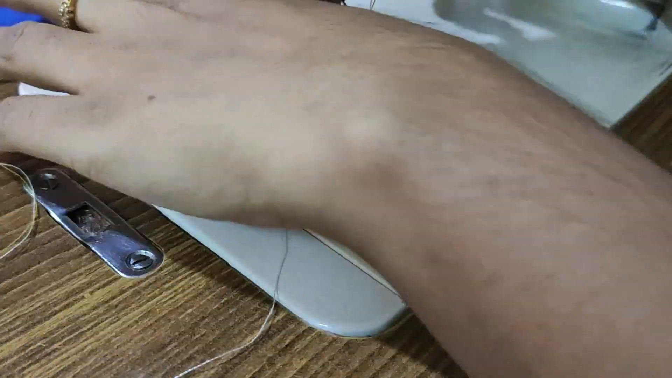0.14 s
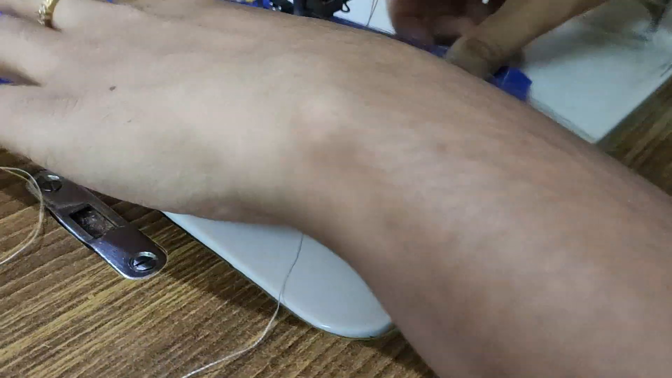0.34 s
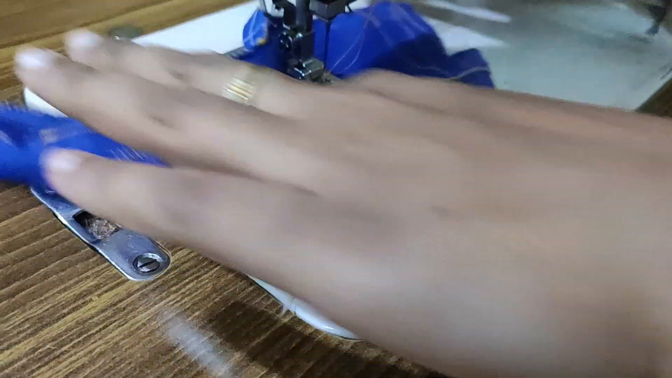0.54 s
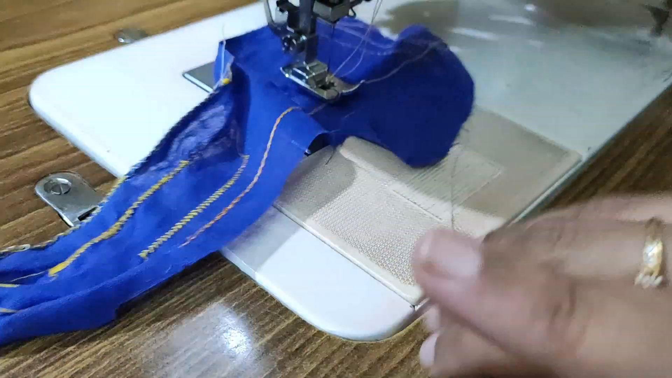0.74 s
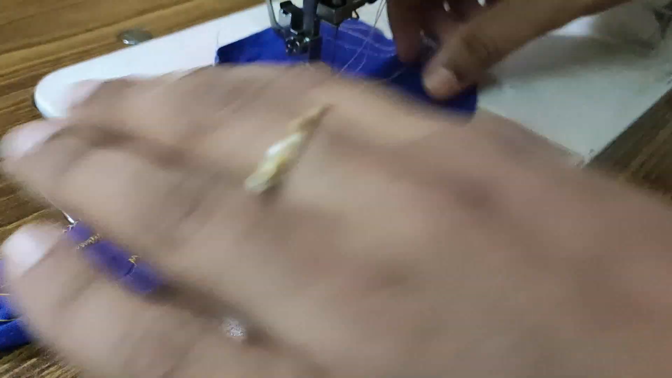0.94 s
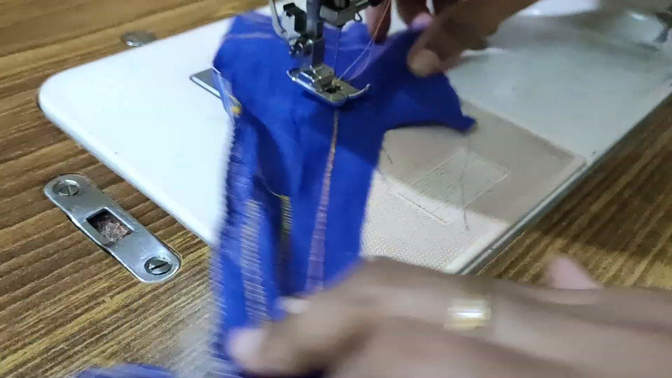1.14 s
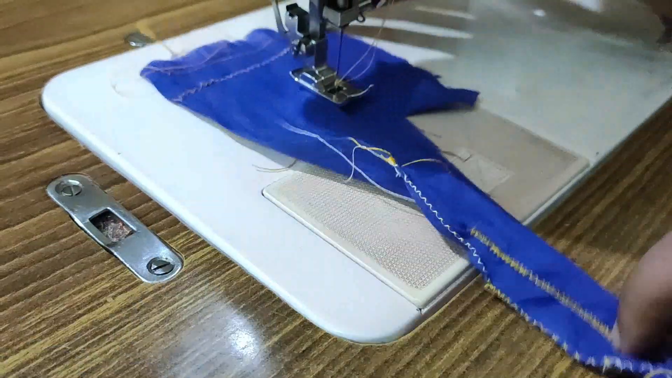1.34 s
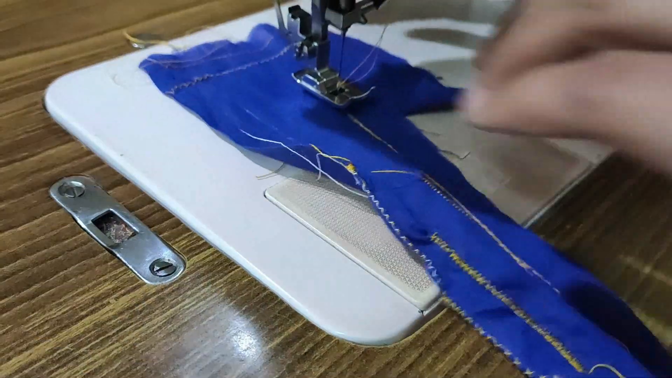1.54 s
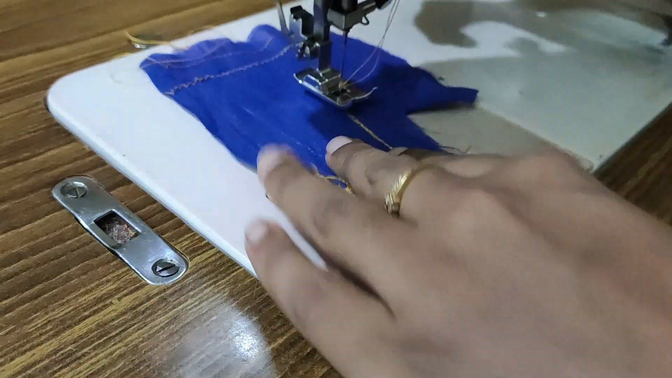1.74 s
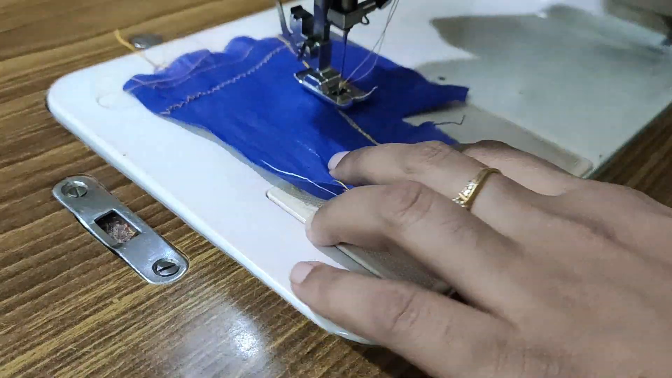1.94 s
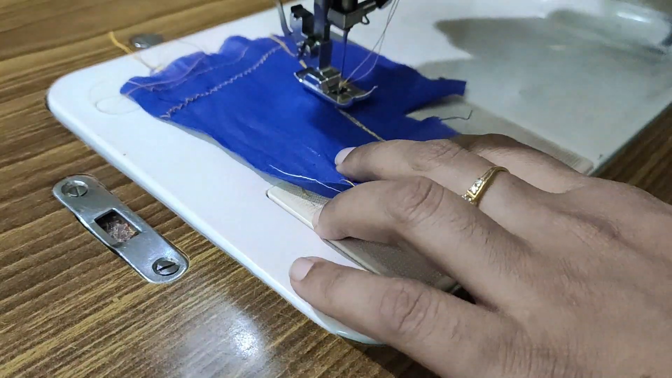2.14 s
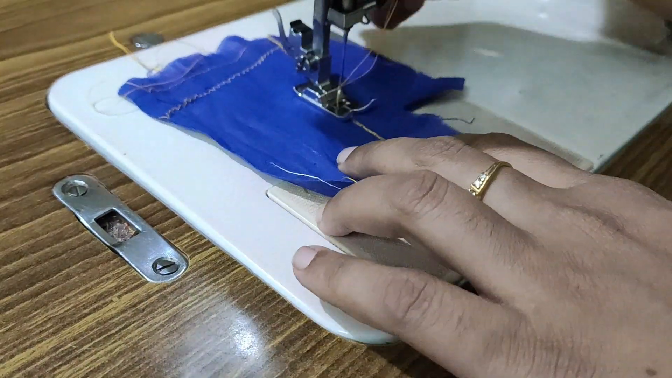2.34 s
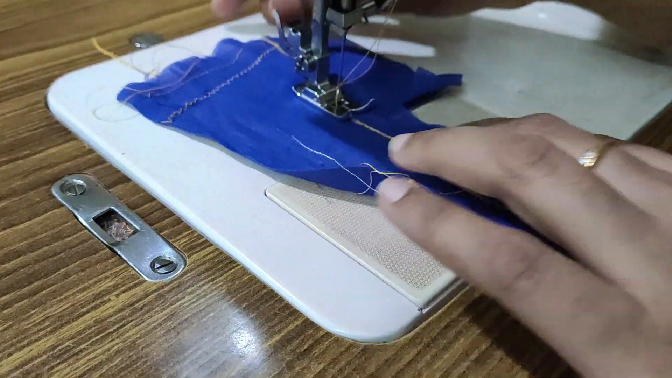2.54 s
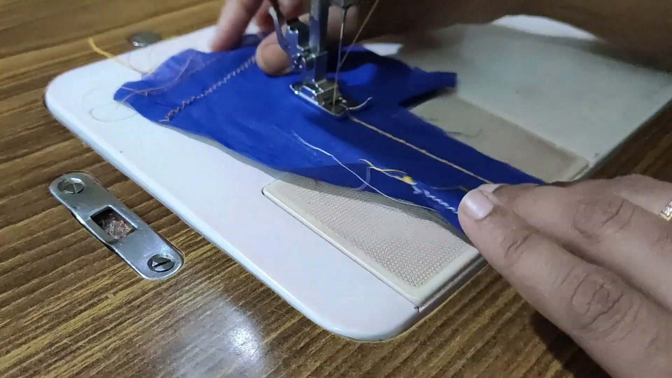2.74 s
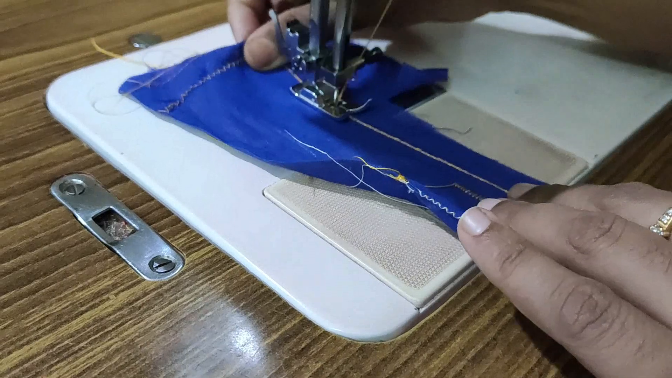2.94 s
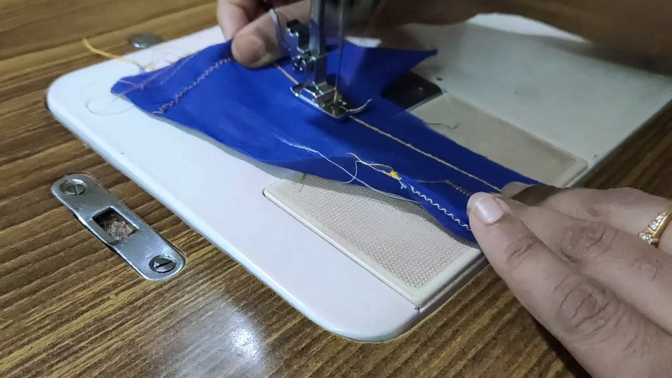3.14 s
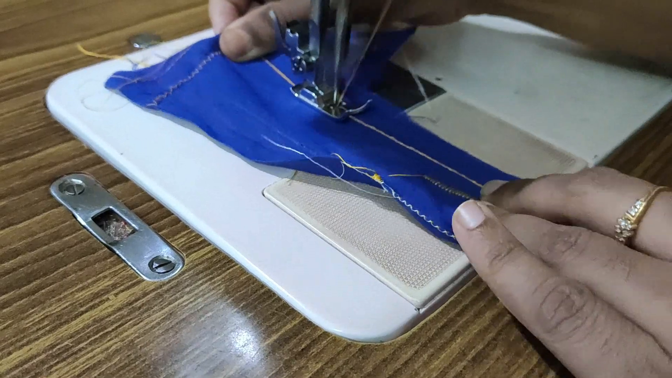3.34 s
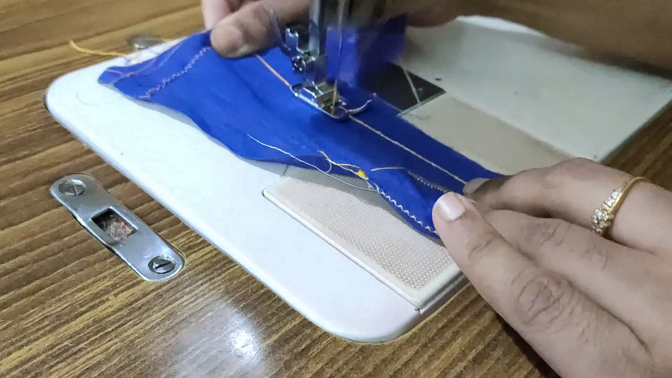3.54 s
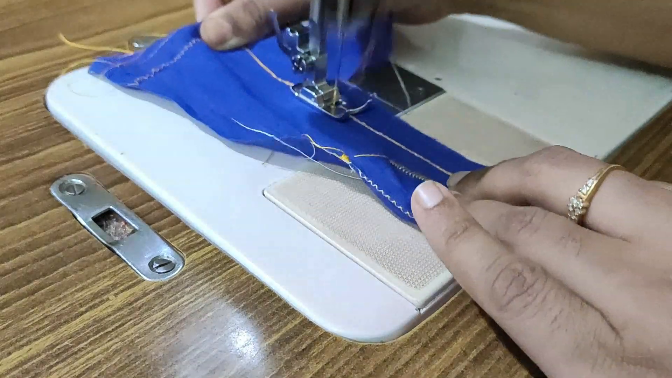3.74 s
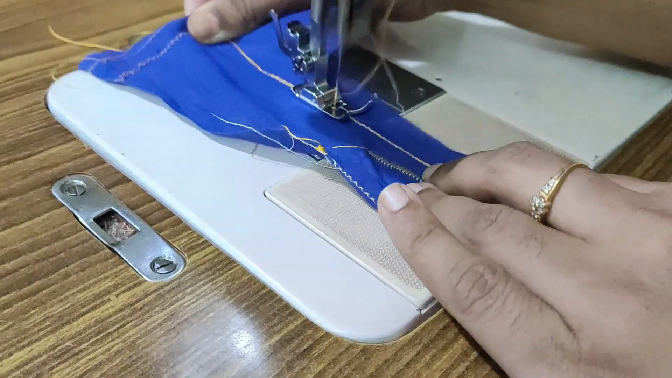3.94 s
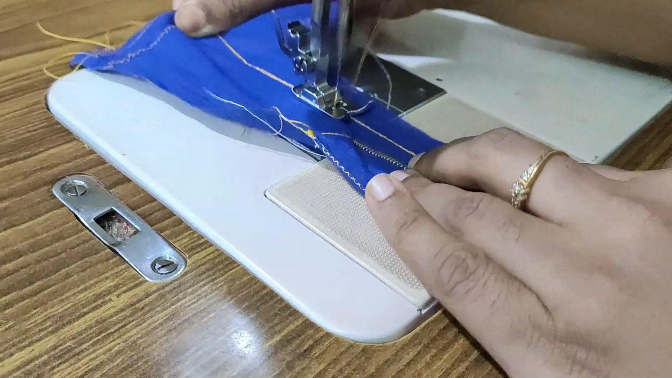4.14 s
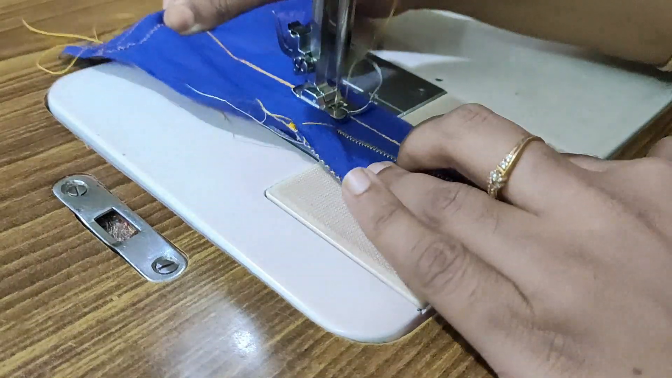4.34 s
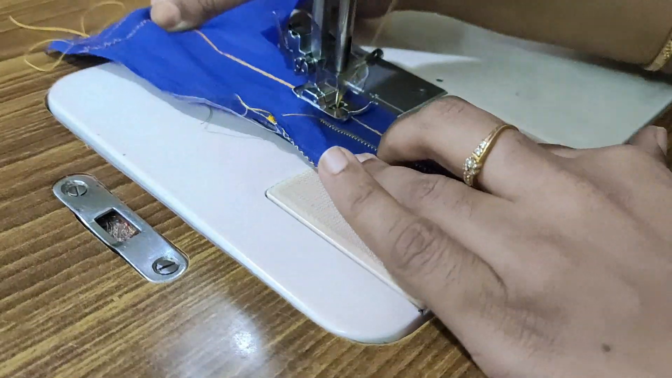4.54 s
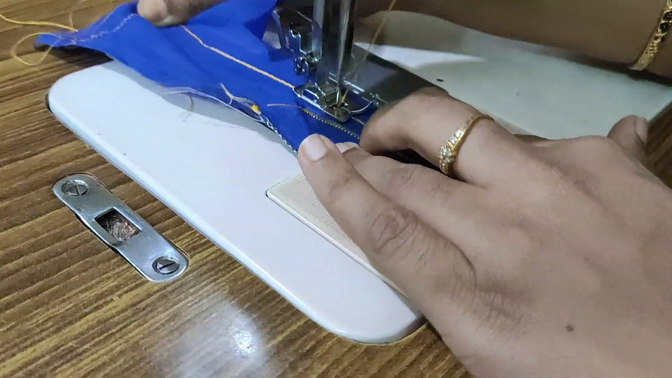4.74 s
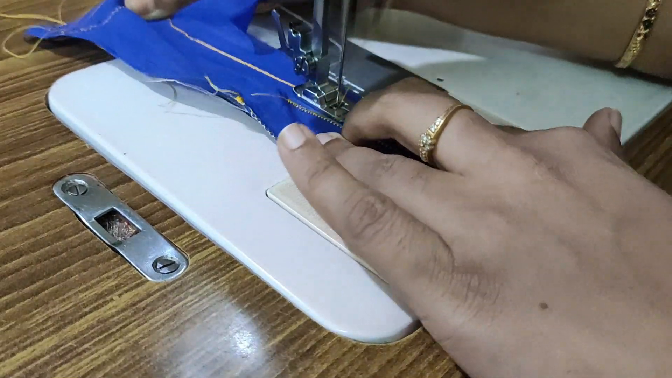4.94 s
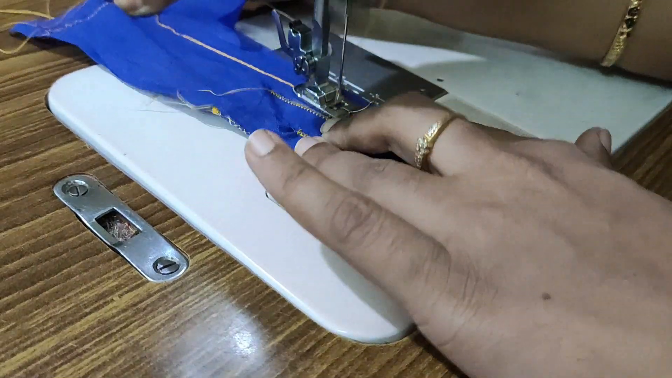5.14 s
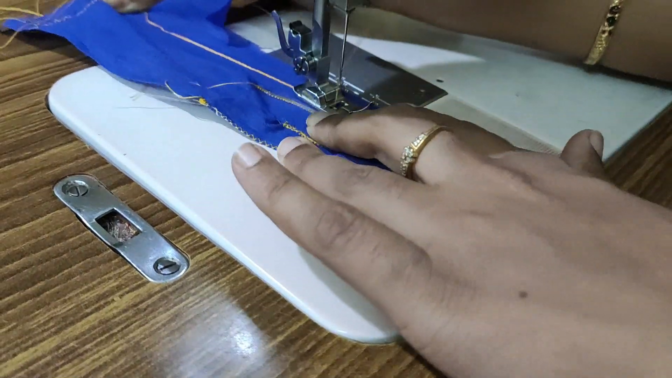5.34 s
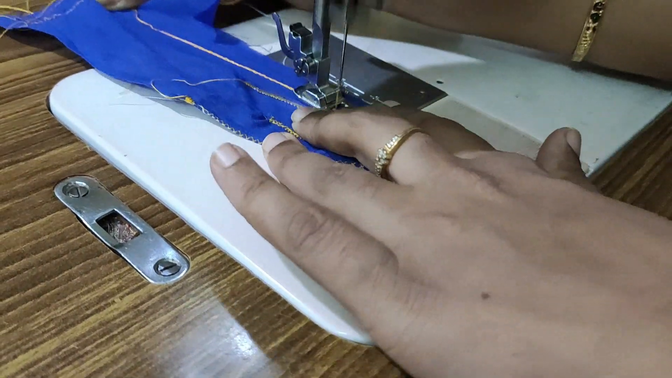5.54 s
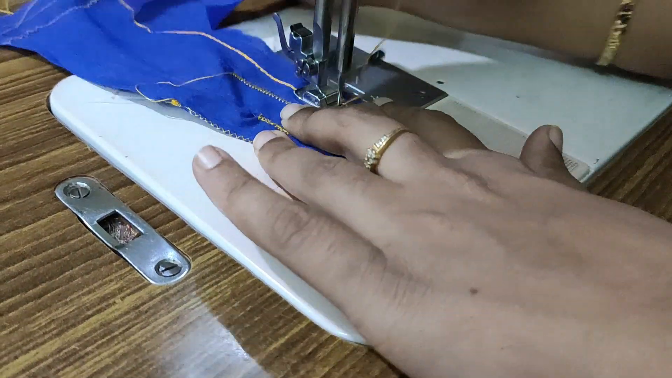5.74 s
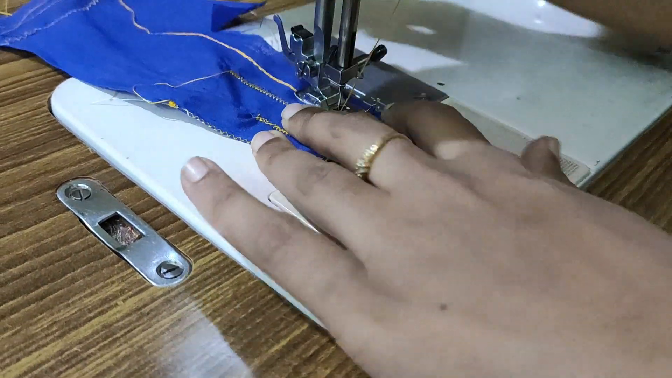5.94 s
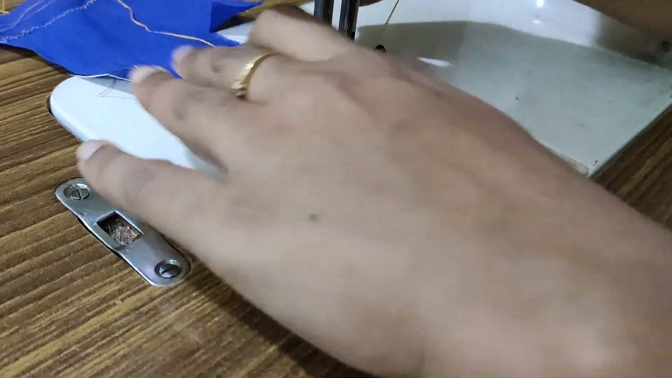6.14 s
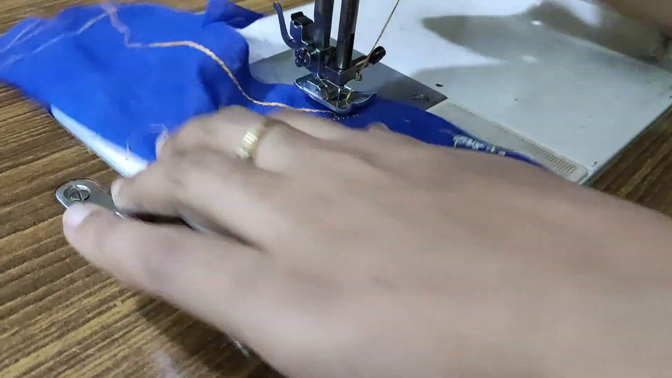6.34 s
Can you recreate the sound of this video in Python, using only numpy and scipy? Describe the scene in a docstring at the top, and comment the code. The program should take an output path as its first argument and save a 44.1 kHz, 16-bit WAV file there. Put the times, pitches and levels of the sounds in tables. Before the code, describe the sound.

Stereo close microphones hear an electric sewing machine on a table. First come scattered metal ticks, dull palm bumps and dry fabric swishes over a low rumble. After a hard double clack the machine jerks into motion, hesitates, then runs steadily at about fourteen stitches a second, steel snapping over duller knocks. It abruptly winds down, and hands brush and click again in the short room echo.

```python
"""Sewing machine on a table

An electric sewing machine in a small hard room, close by. Hands push the cloth and click on the presser foot.
The shaft starts with slow stitches, runs up to a steady clatter and stops. Each turn gives one bright steel snap
and a round of duller linkage knocks, all filtered noise bursts; rubbing is filtered noise, hum and buzz are sines."""
import sys
import numpy as np
from scipy import signal
from scipy.fft import rfft, irfft, next_fast_len
from scipy.io import wavfile
from scipy.ndimage import uniform_filter1d

SR = 44100
rng = np.random.default_rng(int(sys.argv[2]) if len(sys.argv) > 2 else 0)


def put_to_file(sound):
    """Save the sound as 16-bit audio at rate SR, in the file named by the first command-line argument."""
    columns = np.atleast_2d(sound).T  # one column per channel
    safe = np.clip(columns, -1, 1)
    whole_steps = np.round(safe * 32767)
    wavfile.write(sys.argv[1], SR, whole_steps.astype(np.int16))


N = 286037
TIME = np.arange(N) / SR
BINS = np.fft.rfftfreq(8192, 1 / SR)

# resonances of the iron frame and the table (the narrow one near 400 Hz is the table's): hz, width_hz, lift_db
FRAME_RESONANCES = [(334, 14, 2.6), (394, 8.8, 3.5), (671, 140, 4.5), (890, 91, 1.5), (1160, 72, 3.5),
                    (1415, 220, 5.6), (1824, 180, 2.9), (2620, 130, 3.2)]
# resonances of the steel needle parts: hz, width_hz, lift_db
STEEL_RESONANCES = [(5720, 42, 3), (6190, 250, 5.7), (6540, 120, 1), (6780, 89, 1.2), (7200, 18, 1.7),
                    (7400, 170, 11), (8100, 59, 5), (8630, 160, 6.8), (9670, 90, 8), (11200, 43, 7.5),
                    (11400, 280, 3.9)]


def amp(db):
    """Decibels to gain."""
    return 10 ** (np.asarray(db) / 20)


def evened(x):
    """Scales to an rms of 1."""
    return x / np.sqrt(np.mean(x ** 2) + 1e-20)


def curve(rows):
    """Joins (s, value) rows by straight lines."""
    return np.interp(TIME, *np.transpose(rows))


def read(points, hz=BINS):
    """Joins (Hz, value) rows on a log-frequency axis."""
    f, value = np.transpose(points)
    return np.interp(np.log(hz + 1), np.log(f + 1), value)


def peaks(modes):
    """Summed lift in dB of (Hz, width Hz, dB) resonances."""
    return sum(db / (1 + (2 * (BINS - hz) / width_hz) ** 2) for hz, width_hz, db in modes)


def band_shape(hz, octaves):
    """Band-pass shape in dB, 3 dB down at the given octaves either side of the centre."""
    return -10 * np.log10(1 + (np.log2((BINS + 1) / hz) / octaves) ** 4)


def high_shape(hz, power):
    """High-pass shape in dB, 3 dB down at hz."""
    return -10 * np.log10(1 + (hz / (BINS + 1)) ** power)


def convolve(x, response):
    """Convolution along time, cut to the scene's length."""
    return signal.fftconvolve(np.atleast_2d(x), np.atleast_2d(response), axes=1)[:, :N]


def colour(x, db):
    """Minimum-phase filter of unit energy with the given dB shape, by folding the cepstrum."""
    cepstrum = irfft(np.log(amp(db)))
    half = len(cepstrum) // 2
    causal = 2 * cepstrum[:half] * (np.arange(half) > 0)
    taps = irfft(np.exp(rfft(causal, 2 * half)))[:half]
    return convolve(x, taps / np.linalg.norm(taps))


def grit(samples):
    """White noise smoothed over a number of samples, rms 1."""
    return evened(uniform_filter1d(rng.standard_normal(N), size=samples))


def noise(size):
    """White noise at two microphones, alike in the bass and nearly unrelated in the treble."""
    # correlation of the two microphones: hz, likeness (0-1)
    likeness = [(60, 0.88), (130, 0.92), (300, 0.9), (640, 0.78), (1400, 0.46), (3100, 0.037),
                (6800, 0.016), (15000, 0.031)]
    padded = next_fast_len(size)
    a, b = rfft(rng.standard_normal((2, padded)))
    same = np.clip(read(likeness, np.fft.rfftfreq(padded, 1 / SR)), -1, 1)
    return irfft(np.array([a, same * a + np.sqrt(1 - same ** 2) * b]), padded)[:, :size]


def burst(ring_s, rise_s=0.0036, size=4096):
    """Dense dying ring of one blow: spectrum flattened, enveloped again, then scaled to unit energy."""
    t = np.arange(size) / SR
    spectrum = rfft(noise(size) * np.exp(-t / ring_s))
    flat = irfft(spectrum / (abs(spectrum) + 1e-9), size)
    ring = flat * np.exp(-t / (4 * ring_s)) * (1 - np.exp(-t / rise_s))
    return ring / np.linalg.norm(ring, axis=1, keepdims=True)


def add(mix, s, sound):
    """Adds a sound at time s."""
    part = mix[:, max(round(s * SR), 0):][:, :sound.shape[1]]
    part += sound[:, :part.shape[1]]


def background(rumble_db=-2, air_db=-64):
    """Low rumble of drifting level and the faint steady air of the room, both coloured noise."""
    # rumble before rumble_db: time_s, level_db
    rumble_level = [(0, -51.5), (.7, -50.5), (1.05, -57.5), (1.4, -56), (3.2, -51.5), (5.9, -49),
                    (6.3, -46)]
    # spectrum of the rumble: hz, relative_db
    rumble_colour = [(15, -0.5), (26, -6.5), (36, -11), (50, 0.5), (75, -10), (120, -16.5), (250, -26.5),
                     (600, -68), (2000, -76)]
    # spectrum of the air: hz, relative_db
    air_colour = [(59, -56), (100, -7), (1170, -21), (1520, -23.5), (2370, -22), (2930, -27), (4020, -24),
                  (4980, -31), (10700, -27.5), (16000, -38)]
    rumble = amp(rumble_db + curve(rumble_level)) * colour(noise(N), read(rumble_colour))
    return rumble + amp(air_db) * colour(noise(N), read(air_colour))


def room(x, delay_s=0.001, early=1.0, early_s=0.079, size=32768):
    """Dense echoes, strongest early, with a noise tail in which each band dies at its own speed."""
    # decay: hz, t60_s
    decay = [(200, 1), (400, 1.5), (700, 0.86), (1400, 0.63), (3700, 0.69), (10000, 0.36), (16000, 0.5)]
    hz, t, z = signal.stft(noise(size), SR, nperseg=256)
    tail = signal.istft(z * amp(-60 * t / read(decay, hz)[:, None]), SR, nperseg=256)[1]
    t = np.arange(tail.shape[1]) / SR
    tail = tail * (1 - np.exp(-(t / delay_s) ** 2)) * (1 + early * np.exp(-t / early_s))
    return convolve(x, tail / np.linalg.norm(tail[0]))


def ports(x, lag_s=.0001):
    """The left microphone hears the machine a moment later, with less bass and more treble."""
    # balance: hz, left_minus_right_db
    balance = [(60, -8), (110, -3), (200, -2.5), (380, 0.5), (700, -1.5), (1290, 2), (2380, -1.5),
               (4400, 6), (8120, 1), (15000, 4.5)]
    padded = next_fast_len(N)
    hz = np.fft.rfftfreq(padded, 1 / SR)
    lean = amp(read(balance, hz) / 2)
    left = np.exp(-2j * np.pi * hz * lag_s) * lean
    return irfft(rfft(x, padded) * [left, 1 / lean], padded)[:, :N]


def touches(per_s=5, level_db=-41, spread_db=2, ring_s=0.0085, rise_s=0.0014):
    """Fingers pat the cloth and the bed at random while the shaft is at rest."""
    # spectrum: hz, relative_db
    touch_colour = [(60, 7), (280, -10), (600, -6), (1300, -20), (2500, -23), (6000, -30), (16000, -40)]
    out = np.zeros((2, N))
    rate, _ = shaft()
    for s in TIME[(rng.random(N) < per_s / SR) & (rate == 0)]:
        add(out, s, amp(level_db + spread_db * rng.standard_normal()) * burst(ring_s, rise_s))
    return colour(out, read(touch_colour))


def bumps(level_db=23, octaves=0.54, rise_s=0.002):
    """A palm or fingertip lands on the cloth with a dull, soft thud: a band-passed burst."""
    # thuds, before level_db: start_s, level_db, centre_hz, ring_s
    thuds = [(.25, -49, 375, 0.0049), (.945, -52, 295, 0.0047), (1.092, -52.5, 290, 0.011),
             (1.152, -48.5, 210, 0.0065), (1.18, -48, 170, 0.0045), (1.824, -54.5, 345, .012),
             (6.169, -57, 362, 0.0045), (6.187, -42, 130, 0.0041), (6.256, -46, 129, 0.0065)]
    out = np.zeros((2, N))
    for s, db, hz, ring_s in thuds:
        add(out, s, amp(db + level_db) * colour(burst(ring_s, rise_s), band_shape(hz, octaves)))
    return out


def squeaks(glide=0.055, rough=0.017, upper_db=(-22, -20)):
    """A dry joint slips in a short uneven tone that rises and falls."""
    # squeaks: start_s, length_s, pitch_hz, level_db, overtones_db
    tones = [(0.853, 0.17, 1067, -70, -23), (2.315, 0.06, 1336, -55, 9)]
    out = np.zeros(N)
    slip = rough * grit(60)
    for s, length_s, hz, db, overtones_db in tones:
        swell = np.sin(np.pi * np.clip((TIME - s) / length_s, 0, 1))
        angle = 2 * np.pi * np.cumsum(hz * (1 + slip + glide * (swell - .5))) / SR
        upper = sum(amp(partial_db) * np.sin(k * angle) for k, partial_db in enumerate(upper_db, 3))
        overtones = np.sin(2 * angle) + upper
        out += amp(db) * swell * evened(np.sin(angle) + amp(overtones_db) * overtones)
    return out


def cloth(level_db=1, grain_db=2.0, drag_db=1.0, roundness=.5):
    """Each push of the cloth over the bed swells and fades as noise, dragging and catching unevenly."""
    # pushes, before level_db: start_s, length_s, level_db, peak_share
    slides = [(0, 0.69, -64, 0.25), (0.605, 0.32, -60.5, 0.66), (1.157, .25, -56, 0.23),
              (1.293, 0.25, -58.5, .25), (1.636, 0.086, -67, .5), (1.858, 0.22, -61.5, .15),
              (2.06, .1, -72, .5), (2.588, 0.36, -60.5, 0.52), (6.152, 0.83, -54.5, .4)]
    # spectrum: hz, relative_db
    cloth_colour = [(200, 8), (1000, -12), (3000, -2), (5500, -2.5), (8000, 0.5), (10300, 5), (13000, 2),
                    (16000, -1)]
    push = np.zeros(N)
    for s, length_s, db, peak in slides:
        corners = [0, np.clip(peak, .02, .98), 1]
        push += amp(db) * np.interp((TIME - s) / length_s, corners, [0, 1, 0]) ** roundness
    drag = amp(grain_db * grit(50) + drag_db * grit(1400))
    return amp(level_db) * push * evened(colour(noise(N) * drag, read(cloth_colour)))


def plate(size=4096):
    """Clear metallic ring of the needle plate after a blow: dying sines, unit energy."""
    # modes: hz, relative_db, t60_s
    plate_modes = [(1310, 1.5, 0.088), (1400, 0.5, 0.11), (2407, -3, 0.057), (2557, -1.5, .05),
                   (3780, -6, 0.049), (4310, -11, .04)]
    t = np.arange(size) / SR
    ring = np.zeros((2, size))
    for hz, db, t60_s in plate_modes:
        ring += amp(db - 60 * t / t60_s) * np.sin(2 * np.pi * (hz * t + rng.random((2, 1))))
    return ring / np.linalg.norm(ring[0])


def clicks(focus=1, plate_db=-8, level_db=23, sharpness=5, rise_s=0.0013,
           tick_db=-17, tick_s=0.00089, tick_hz=5000):
    """Light blows on presser foot and bed: contact tick, burst and plate ring; focus scales the resonances."""
    # blows, before level_db: start_s, level_db, bass_db, treble_db, ring_s, resonance_hz, lift_db
    blows = [(0.018, -49, 14, -20, 0.0021, 830, 15), (.077, -38, 10, -12, 0.0031, 800, 11),
             (0.105, -55, 0, 22, .002, 12000, 15), (0.2455, -40.5, -2, -15, 0.0023, 2510, 11),
             (.361, -32.5, -5, 2, 0.0055, 1890, 2), (.376, -28, 7.5, 3, 0.0021, 1290, 1.5),
             (.384, -39, 10, -1, 0.0067, 430, 17), (.397, -41, 13, -7, 0.0022, 1320, 6),
             (0.422, -56, 7, -5, .003, 2900, 3), (.446, -55, 5, -6, .003, 1320, 11),
             (.5105, -35, -1.5, -8, 0.0064, 2500, 13), (0.514, -41, -7, -8, 0.003, 4300, 12),
             (.527, -52, 3, -4, .004, 2600, 6), (.54, -43, -4, -4, 0.0034, 2450, 7),
             (.576, -45.5, -3, -3, 0.0034, 4200, 6), (.582, -44.5, -3, -1, 0.024, 10200, 32),
             (.716, -43, -3, -11, 0.0032, 810, 14.5), (0.915, -56, -10, 32, .001, 13500, 32),
             (0.948, -53.5, -6, 14, 0.0011, 2200, 4), (1.327, -41.5, 3, 3, 0.0078, 1880, 15),
             (1.329, -43.5, -7, 10, 0.016, 10200, 24), (1.346, -46.5, -2, -6, 0.0089, 850, 19),
             (1.889, -53.5, 18, 0, 0.0082, 1400, -10), (2.002, -57, -14, -4, 0.0049, 2200, -3),
             (2.066, -58, 7, -12, 0.0059, 760, 21), (2.39, -34, 7.5, 12, 0.0086, 5750, 15),
             (2.545, -45, -21, -2, 0.0061, 2100, -5), (2.55, -29.5, -12, 29, 0.0015, 2100, 26),
             (2.551, -26.5, 6, 12, 0.0014, 730, 13.5), (2.554, -32.5, 6, 7, 0.00091, 623, 24),
             (6.207, -36.5, 7, 5, 0.0085, 1150, 13), (6.287, -29.5, 12, 0.5, 0.0058, 1320, 1),
             (6.434, -40.5, 14, -9, .005, 755, 17), (6.47, -43, 29, -4, 0.0079, 720, 18)]
    # common spectrum: hz, relative_db
    click_colour = [(60, -26), (200, -8), (350, -7), (550, -9.5), (900, -1), (1350, -10.5), (1750, -2.5),
                    (2450, -5), (3300, -8), (4400, -9.5), (7000, -15.5), (11000, -22.5), (16000, -56)]
    # presser foot and needle plate: hz, width_hz, lift_db
    foot_resonances = [(390, 110, 5), (910, 130, 2.5), (1310, 270, 7.5), (2250, 540, 6.5), (3580, 200, 1),
                       (4200, 180, 3.5)]
    out = np.zeros((2, N))
    bass, treble = 1 / (1 + (BINS / 900) ** 2), 1 / (1 + (4000 / (BINS + 1)) ** 2)
    tick_shape = high_shape(tick_hz, 2)
    for s, db, bass_db, treble_db, ring_s, hz, lift_db in blows:
        resonances = peaks(foot_resonances + [(hz, hz / sharpness, lift_db)])
        shape = read(click_colour) + bass_db * bass + treble_db * treble + focus * resonances
        add(out, s, amp(db + level_db) * colour(burst(ring_s, rise_s), shape))
        add(out, s, amp(db + level_db + plate_db) * colour(plate(), shape))
        # bassy clicks get a weaker tick
        add(out, s, amp(db + level_db + tick_db - bass_db / 2) * colour(burst(tick_s), tick_shape))
    return out


def motor(buzz_hz=100, level_db=-53, press_s=2.79, release_s=5.85, partials_db=(0, -6, -5, -12)):
    """The motor's iron buzzes at twice the mains frequency while the pedal is down."""
    pedal = np.clip((TIME - press_s) / 0.021, 0, 1) * np.clip((release_s - TIME) / 0.093, 0, 1)
    buzz = np.zeros(N)
    for k, db in enumerate(partials_db, 1):
        buzz += amp(db) * np.sin(2 * np.pi * (k * buzz_hz * TIME + rng.random()))
    return amp(level_db) * pedal * evened(buzz)


def shaft(first_stitch_s=2.8784):
    """Rate of the main shaft in turns per s, and its angle in turns, whole at each stitch."""
    # one stitch a turn: time_s, turns_per_s
    shaft_speed = [(2.79, 0.0), (2.83, 8.477), (2.9, 8.537), (3.0, 7.203), (3.08, 4.866), (3.17, 9.69),
                   (3.29, 12.076), (3.38, 13.754), (3.58, 14.793), (3.87, 14.895), (4.42, 14.605),
                   (4.66, 14.363), (5.42, 14.418), (5.7, 14.19), (5.82, 13.403), (5.93, 7.006), (6.1, 0.0)]
    rate = curve(shaft_speed)
    turns = np.cumsum(rate) / SR
    return rate, turns - np.interp(first_stitch_s, TIME, turns)


def hum(turns, waver_db=2.0, drone_waver_db=0.3):
    """Unbalanced parts hum at multiples of the shaft rate, all wavering; the strongest swell and fade."""
    # steady lines: shaft_multiple, relative_db
    hum_lines = [(4, -23.5), (8, -29), (15, -18.5), (19, -22), (21, -22), (23, -16.5), (26, -15.5),
                 (27, -29), (31, -14.5), (35, -14), (45, -20), (46, -18)]
    # strongest lines: shaft_multiple
    drone_multiples = (24, 25, 28)
    # their levels: time_s, first_db, second_db, third_db (relative)
    drone_levels = [(3.2, -13, -13, -1), (3.45, -14, -10.5, -8), (3.8, -25, -14, -8.5), (4.2, -14, -15, -8),
                    (4.4, -4.5, -12, -24), (4.55, -13, -6, -11), (4.85, -29, -10, -25),
                    (5.05, -25, -34, -1.5), (5.35, -20, -10.5, -4.5), (5.75, -8, -17, -7.5)]
    knots_s = np.arange(0, TIME[-1] + 1, 1 / 8)

    def line(k, db, depth_db):
        """One wavering multiple of the shaft rate."""
        waver = np.interp(TIME, knots_s, rng.standard_normal(len(knots_s)))
        return amp(db + depth_db * waver) * np.sin(2 * np.pi * (round(k) * turns + rng.random()))

    s, *levels = np.transpose(drone_levels)
    drone = sum(line(k, np.interp(TIME, s, db), drone_waver_db) for k, db in zip(drone_multiples, levels))
    return drone + sum(line(k, db, waver_db) for k, db in hum_lines)


def rubbing(turns, swing_db=2, peak_turn=0.63, grain_db=3, steel_share=0.36,
            rest_db=-5, rest_turn=0.823, rest_width_turns=0.062):
    """Gritty sliding of shafts and belt, swelling once a turn and easing briefly before the snap."""
    # spectrum: hz, relative_db
    rub_colour = [(20, -46), (45, -25.5), (120, -7.5), (220, -14.5), (350, 1.5), (500, -6), (700, -1),
                  (850, 0.5), (1050, -5), (1500, -16), (2200, -4.5), (3400, -3.5), (4800, -11),
                  (11800, -10), (16000, -24.5)]
    from_rest = (turns - rest_turn + .5) % 1 - .5
    rest = np.exp(-(from_rest / rest_width_turns) ** 2)
    swing = np.cos(2 * np.pi * (turns - peak_turn))
    load = amp(rest_db * rest + swing_db * swing + grain_db * grit(60))
    shape = read(rub_colour) + peaks(FRAME_RESONANCES) + steel_share * peaks(STEEL_RESONANCES)
    return evened(colour(noise(N) * load, shape))


def jolts(level_db=27, rise_s=0.0038):
    """The motor tugs at the belt while it gathers speed, and the whole head shudders on the table."""
    # jolts, before level_db: start_s, level_db, ring_s
    tugs = [(2.878, -23.5, 0.039), (3.002, -24, 0.026), (3.157, -29.5, 0.013), (3.247, -23, 0.037),
            (3.423, -17.5, 0.019)]
    # spectrum: hz, relative_db
    jolt_colour = [(40, -28), (90, -7), (200, -10.5), (325, 3), (450, -7), (600, -6), (850, -7),
                   (1300, -10.5), (2400, -9), (4000, -12), (12000, -38)]
    out = np.zeros((2, N))
    for s, db, ring_s in tugs:
        add(out, s, amp(db + level_db) * burst(ring_s, rise_s))
    return colour(out, read(jolt_colour) + peaks(FRAME_RESONANCES))


def linkage(turns, jitter_s=.00011, spread_db=1.28, rise_s=0.0015, settle_s=0.7024):
    """Needle bar, hook and feed knock at fixed angles; each ring slowly crossfades to another."""
    # knocks of one turn: turn_share_after_snap, relative_db, centre_hz, width_octaves, ring_s, looseness (0-1)
    parts = [(.02, 0.5, 2160, 1.14, 0.0094, 1), (.075, -2, 440, 0.94, 0.0013, 0.24),
             (0.152, 1.5, 222, 0.51, 0.0056, 0.23), (.24, -5, 940, 0.81, 0.0022, 0.34),
             (.335, -2.5, 1310, 0.5, 0.0035, 0.6), (.49, 0, 377, 0.53, 0.0018, 0.37),
             (.46, 0.5, 2000, 1.1, 0.0035, 1), (.585, 1.5, 1500, 0.74, 0.007, 0.9),
             (.6, -4, 490, 0.95, 0.0021, 0), (0.698, -2, 710, 0.81, 0.0018, 0.57),
             (.722, 0.5, 1750, .7, .0022, .7), (.75, -2, 940, 0.82, .0011, 0.27),
             (.765, -0.5, 1850, 0.86, 0.0039, 0.87), (.8, 5, 1700, 0.72, 0.0014, 0.9),
             (.88, 0.5, 490, 1.02, 0.0011, 0.3), (.96, -3, 404, 0.87, 0.0024, 0.2)]
    # spectrum of iron frame and table: hz, relative_db
    frame_colour = [(20, -60), (50, -32), (100, -14), (200, -14.5), (290, -5), (350, -5), (410, -3.5),
                    (460, -5.5), (510, -2), (580, -8), (900, -5), (1500, -7), (2400, 0), (3300, -9),
                    (5000, -4), (11000, -5), (16000, -31)]
    out = np.zeros((2, N))
    for share, db, hz, octaves, ring_s, loose in parts:
        blows = np.zeros((2, N))
        rings = [burst(ring_s, rise_s) for _ in range(8)]
        for at in np.flatnonzero(np.diff(np.floor(turns - share))):
            late, strength = rng.standard_normal(2)
            step, blend = divmod(at / SR / settle_s, 1)
            old, new = rings[int(step) % len(rings)], rings[(int(step) + 1) % len(rings)]
            ring = np.cos(blend * np.pi / 2) * old + np.sin(blend * np.pi / 2) * new
            ring = ring + loose * burst(ring_s, rise_s)  # the part that differs every turn
            add(blows, at / SR + jitter_s * late, amp(db + spread_db * strength) * ring)
        out += colour(blows, band_shape(hz, octaves))
    return evened(colour(out, read(frame_colour) + peaks(FRAME_RESONANCES)))


def snaps(turns, speed, fall_db=20.5, spread_db=0.7, ring_s=.0026, rise_s=0.00096, loose=0.91,
          chatter_db=-4, chatter_s=0.022, scrape_db=-7, scrape_lead_s=.0088, lead_s=.0003, patch_db=2.5,
          tick_db=-5, tick_s=0.001, tick_late_s=.0014, tick_hz=9000):
    """Steel scrapes, then meets steel once a stitch with a tick and chatter, louder at speed, colour varying."""
    # force at full speed: time_s, relative_db
    force = [(2.9, -12.5), (3.25, -12), (3.9, -12), (4.45, -11.5), (4.9, -12.5), (5.5, -12), (5.83, -11.5)]
    # spectrum of the steel needle parts: hz, relative_db
    steel_colour = [(200, -10.5), (1000, -9), (2600, -2), (4900, -4), (6000, 2.5), (9300, -2), (11500, 0),
                    (13500, -3), (16000, -20)]
    out, own_ring, force_db = np.zeros((2, N)), burst(ring_s, rise_s), curve(force)
    patch_hz = np.arange(0, SR / 2, 450)
    tick_shape = high_shape(tick_hz, 4)
    for at in np.flatnonzero(np.diff(np.floor(turns))):
        s = at / SR
        # fall_db is the drop for a tenfold fall in speed
        db = force_db[at] + fall_db * np.log10(speed[at]) + spread_db * rng.standard_normal()
        patches = np.interp(BINS, patch_hz, rng.standard_normal(len(patch_hz)))
        ring = own_ring + loose * burst(ring_s, rise_s) + amp(chatter_db) * burst(chatter_s)
        add(out, s - scrape_lead_s, amp(db + scrape_db) * burst(scrape_lead_s, rise_s))
        add(out, s - lead_s, amp(db) * colour(ring, patch_db * patches))
        add(out, s + tick_late_s, amp(db + tick_db) * colour(burst(tick_s, tick_s), tick_shape))
    return colour(out, read(steel_colour) + peaks(STEEL_RESONANCES))


def machine(full_rate=14.4, effort_db=-23, effort_fall_db=33.5, knock_db=-4, snap_db=20, rub_db=-0.5,
            slow_rub_db=-5.0, hum_db=-1.0, knock_growth=0.67):
    """Clatter and hum: knocks, rubbing, snaps and hum grow with shaft speed; jolts have set levels."""
    rate, turns = shaft()
    speed = rate / full_rate  # full_rate in turns per s
    # effort_fall_db is the drop for a tenfold fall in speed
    effort = amp(effort_db + effort_fall_db * np.log10(speed + 1e-9))
    knocks = amp(knock_db) * speed ** knock_growth * linkage(turns)
    rub = amp(rub_db + slow_rub_db * (1 - speed)) * rubbing(turns)
    clatter = effort * (knocks + rub) + amp(snap_db) * snaps(turns, speed) + jolts()
    return clatter, effort * speed ** 3 * amp(hum_db) * hum(turns)


def scene(machine_wet_db=-3.5, click_wet_db=-5, room_focus=0.49, boom_hz=450, boom_width_hz=200, boom_db=5):
    """Machine and hands in one room; clicks spread into it with a broader colour and set the table booming."""
    clatter, drone = machine()
    soft = bumps() + touches() + squeaks()
    spread = colour(clicks(room_focus) + soft, peaks([(boom_hz, boom_width_hz, boom_db)]))
    sewing = ports(clatter + amp(machine_wet_db) * room(clatter) + drone + motor())
    hands = clicks() + soft + amp(click_wet_db) * room(spread) + cloth()
    return sewing + hands + background()


def record(dry, edge_hz=16100):
    """Clips at full scale, then limits the band with a low-pass."""
    low_pass = signal.firwin(511, edge_hz, window=("kaiser", 9), fs=SR)
    return signal.oaconvolve(np.clip(dry, -1, 1), low_pass[None], "same")


dry = scene()
out = record(dry)
put_to_file(out)
```